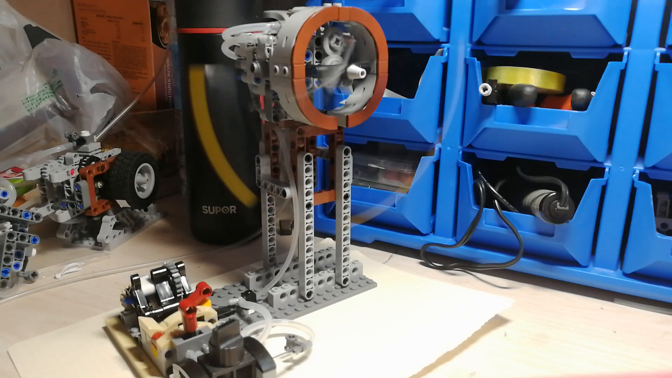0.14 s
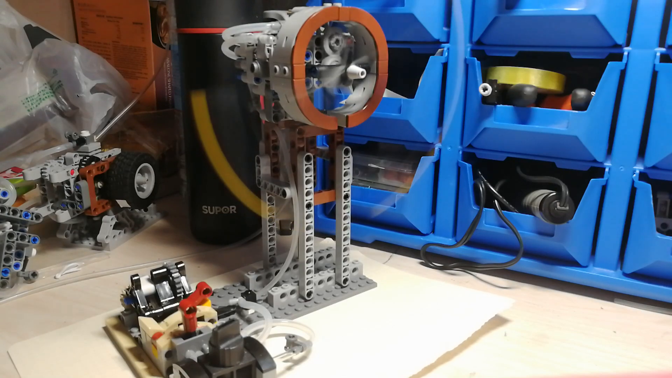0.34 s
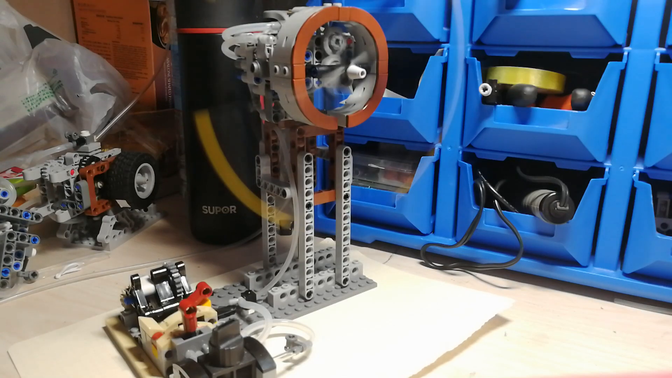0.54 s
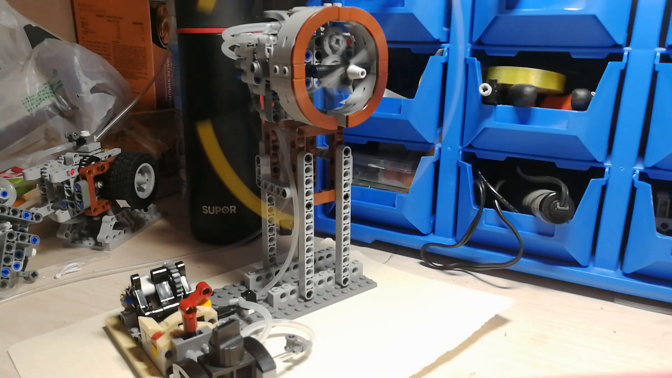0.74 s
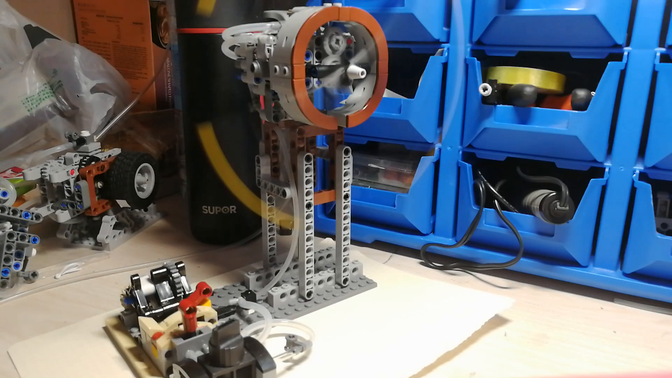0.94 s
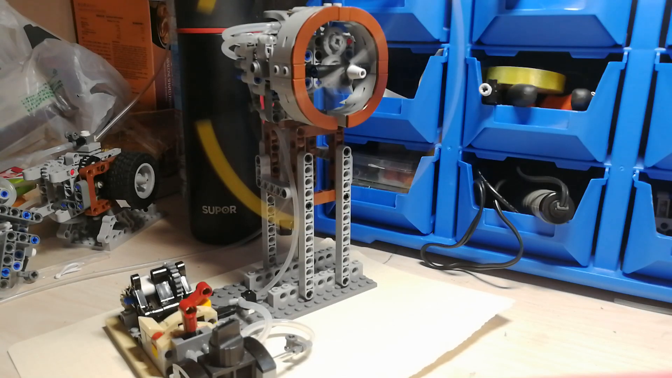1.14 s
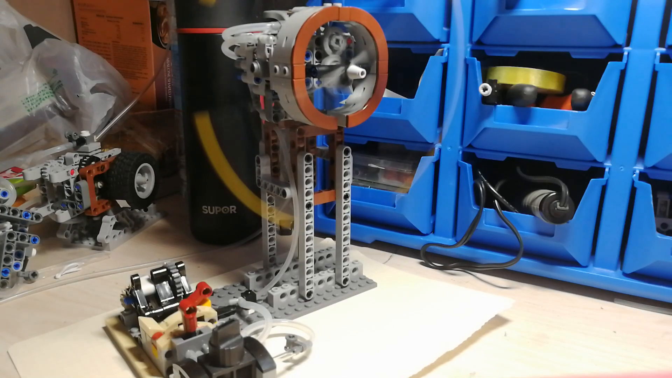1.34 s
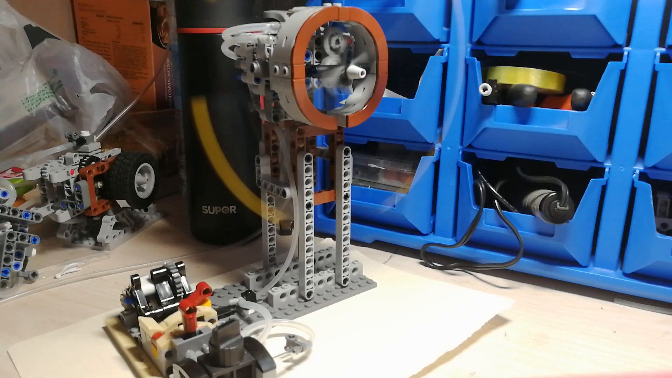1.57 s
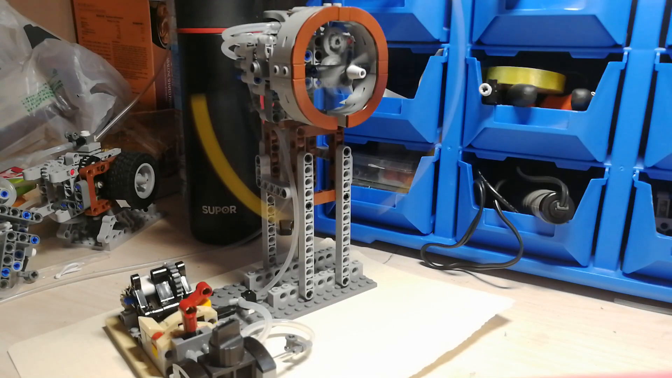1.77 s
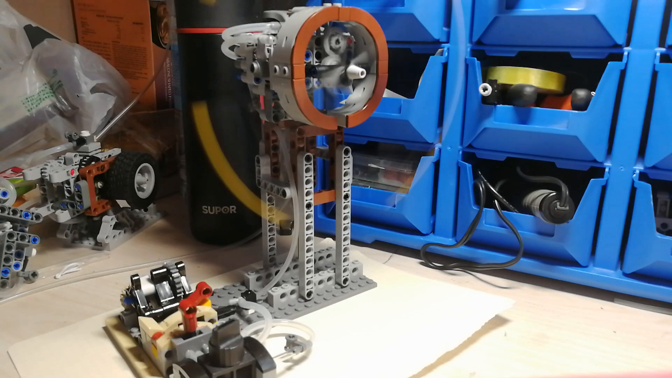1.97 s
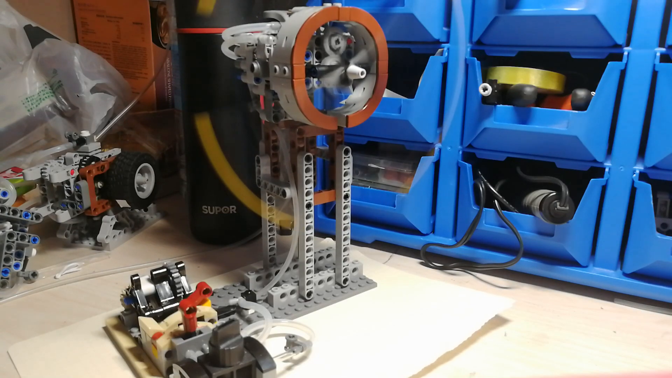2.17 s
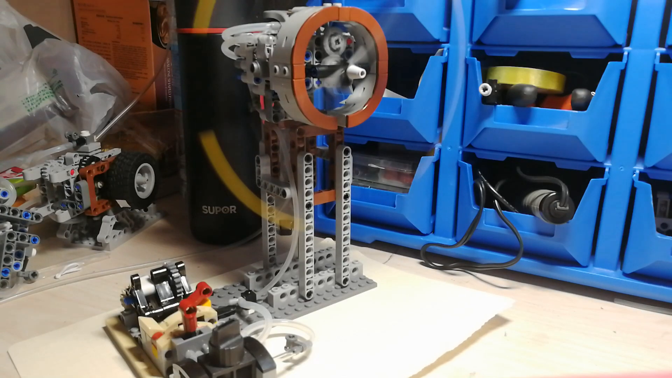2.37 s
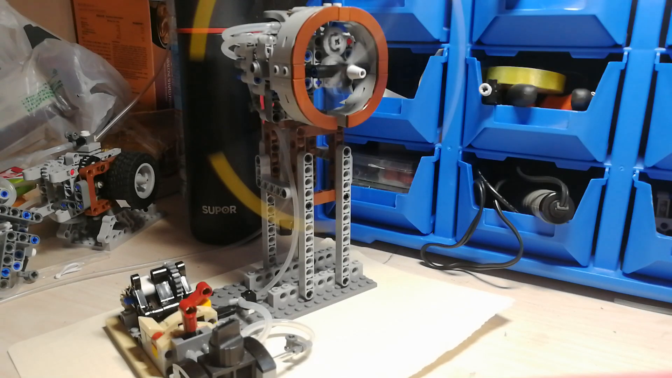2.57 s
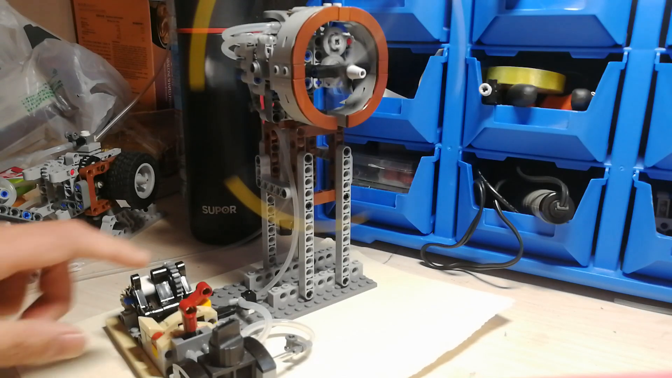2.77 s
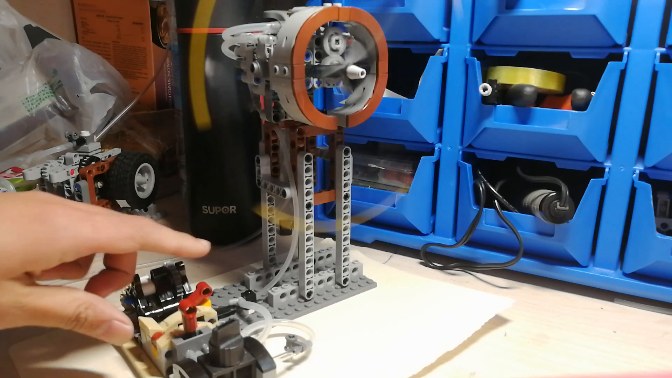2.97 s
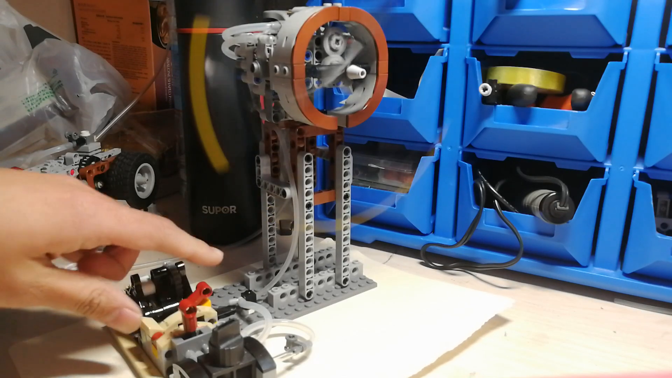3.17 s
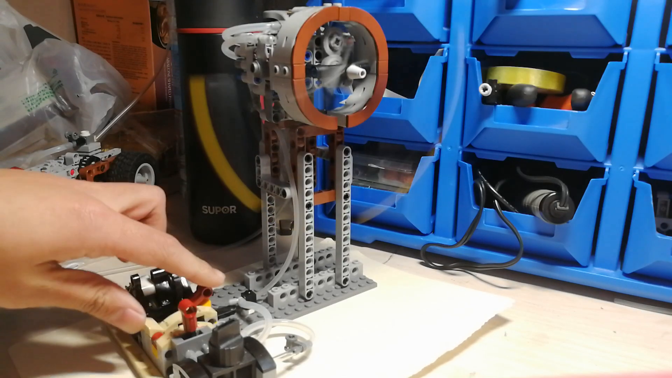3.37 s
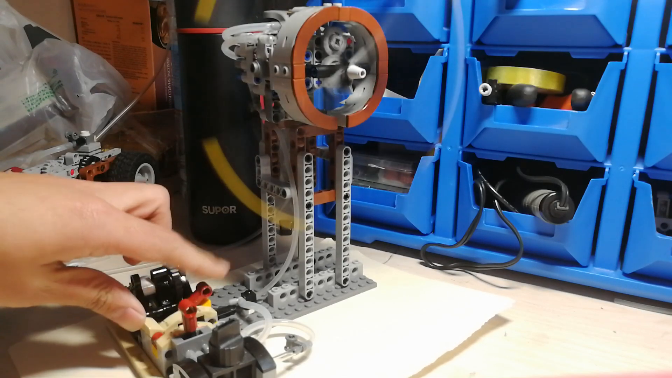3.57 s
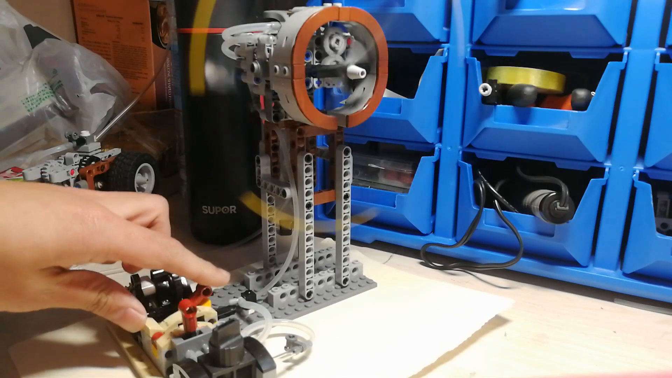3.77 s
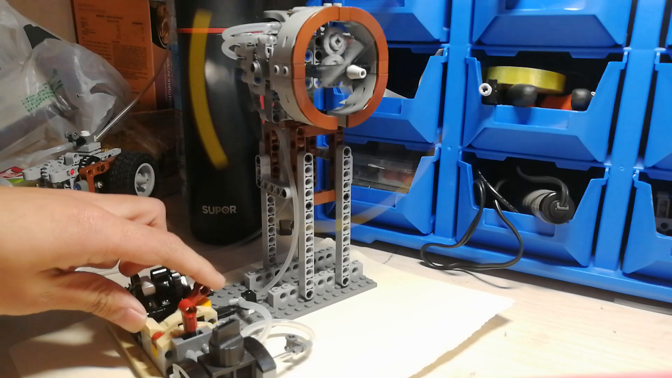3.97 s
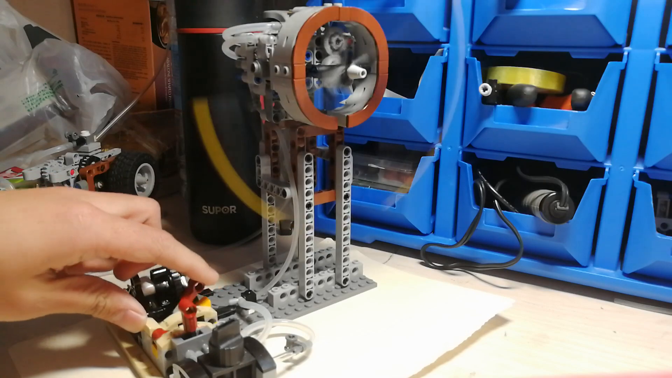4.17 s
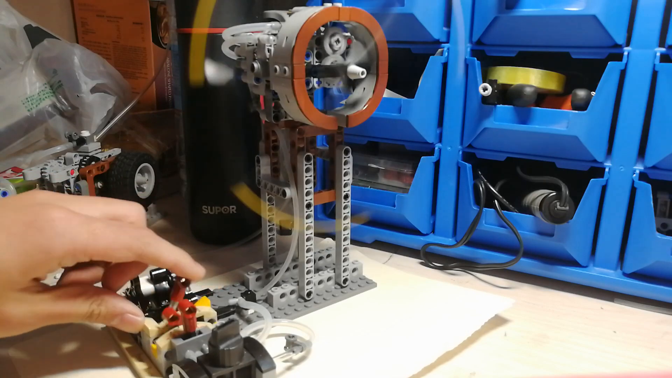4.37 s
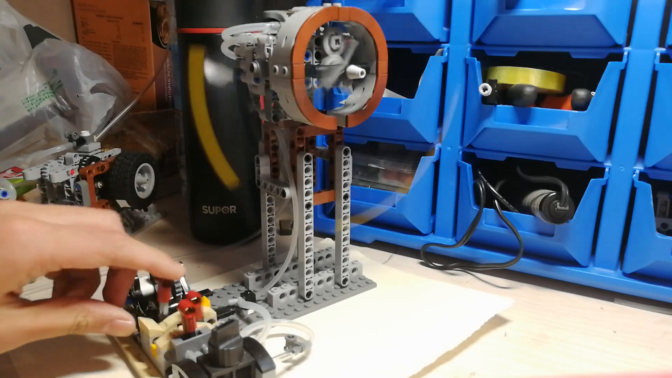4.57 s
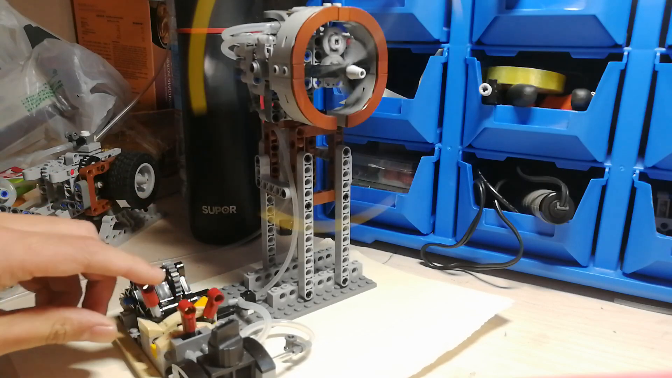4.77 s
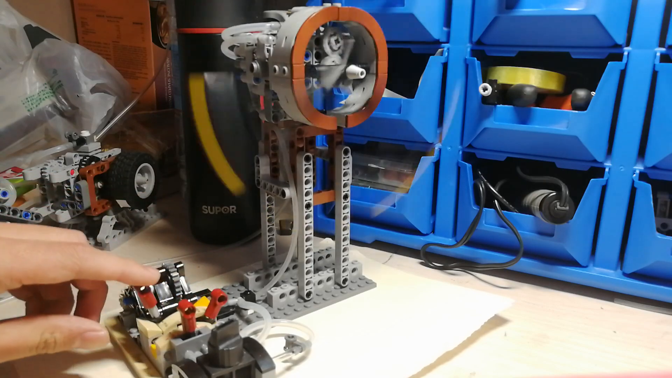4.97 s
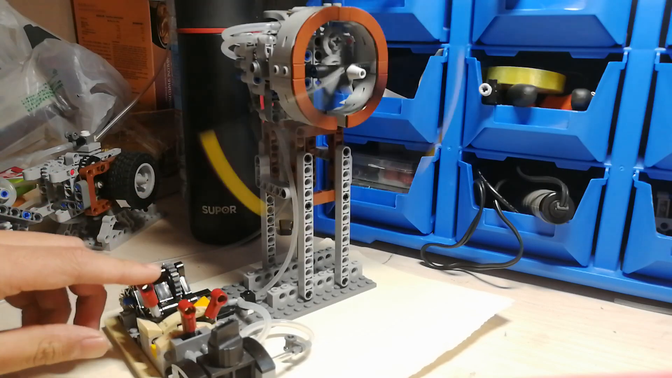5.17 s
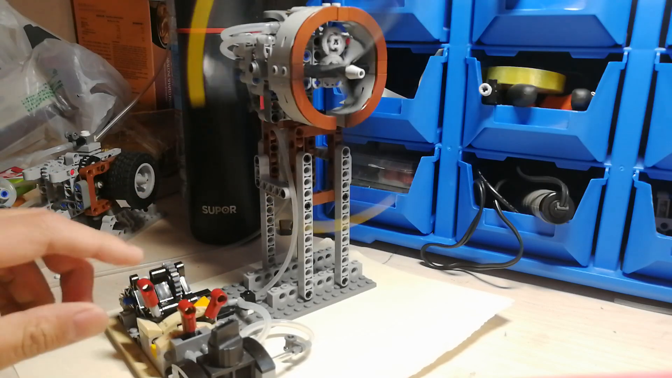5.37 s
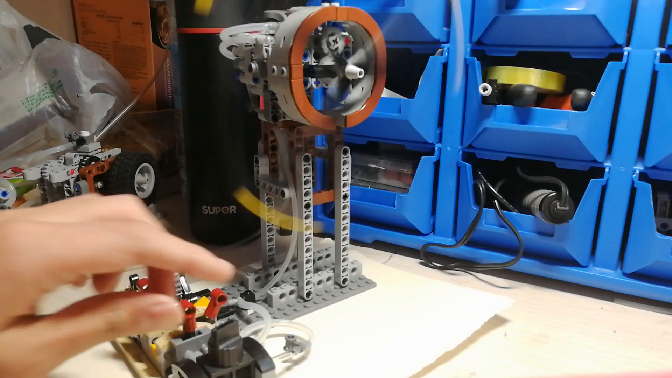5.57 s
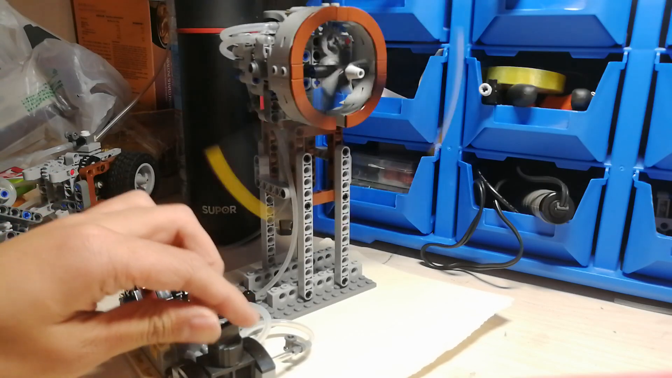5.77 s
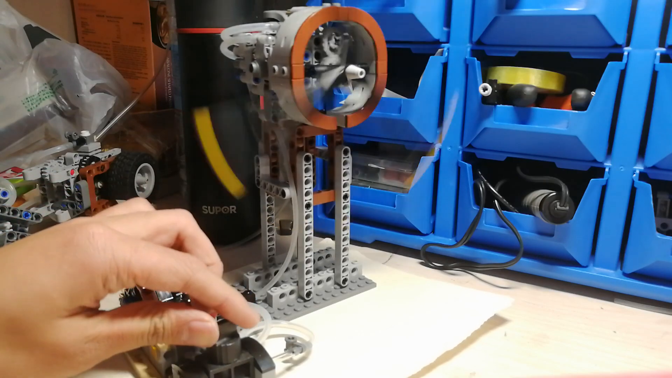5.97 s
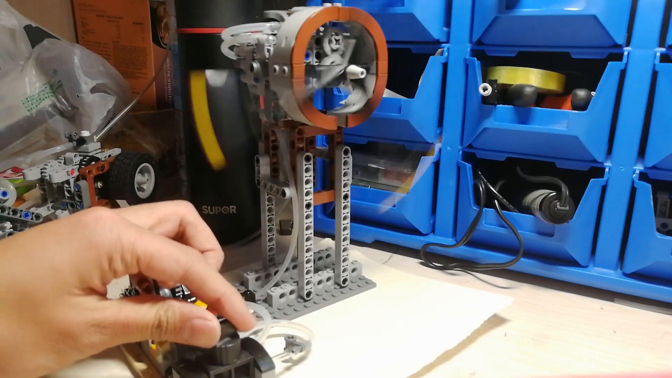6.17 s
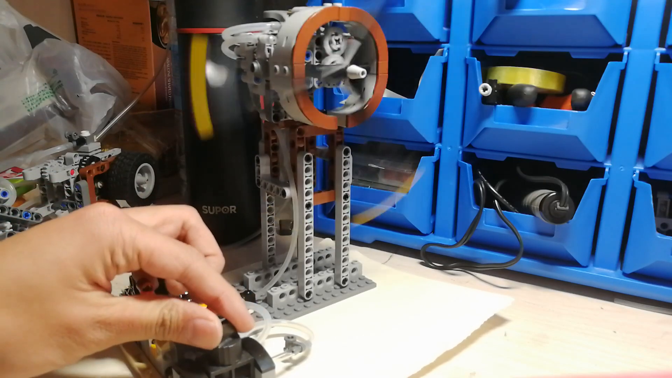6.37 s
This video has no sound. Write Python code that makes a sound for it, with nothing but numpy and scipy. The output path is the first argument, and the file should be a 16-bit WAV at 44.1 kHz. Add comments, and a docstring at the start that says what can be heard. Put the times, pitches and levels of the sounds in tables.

```python
"""A toy air engine made of plastic bricks spins a propeller on a workbench, about ten turns a second.
In every turn the piston clacks at both ends of its travel, used air puffs out and the bench throbs.
Loose pins rattle, air leaks past the seals, and the plastic frame colours these sounds.
Near the end a hand throttles the air: the leak fades, the throttle hisses and the engine chuffs on
at half speed. The small room adds a short echo and a low rumble."""
import sys
import numpy as np
from scipy import signal
from scipy.fft import rfft, irfft, next_fast_len
from scipy.io import wavfile
from scipy.ndimage import map_coordinates

SR = 44100
rng = np.random.default_rng(int(sys.argv[2]) if len(sys.argv) > 2 else 0)


def master_out(mix):
    """Clip the mix to full scale and print it as 16-bit PCM to the path in sys.argv[1]."""
    frames = np.transpose(np.atleast_2d(mix))
    ceiling = np.clip(frames, -1, 1)
    pcm = np.round(ceiling * 32767).astype(np.int16)
    wavfile.write(sys.argv[1], SR, pcm)


N = 283563

# Tone of the bright clack and of the dull knock: f/Hz, level/dB
CLACK_TONE = [(600, -32), (2000, -22), (3200, 1.5), (5200, 0), (6500, 8), (9500, 6.5), (11000, -1),
              (13000, -27), (16000, -52)]
KNOCK_TONE = [(150, -19.5), (400, -11.5), (600, -6), (780, -7.5), (1000, -6), (1500, 0), (2100, -2.5),
              (3000, -8), (6000, -31.5)]
def clatter(frame):
    """The engine's hits all sound through the same bricks: a bright clack over a dull knock."""
    clack_force, knock_force = np.linalg.norm([linkage(), hard_snaps(), rattle()], axis=0)
    clack = radiate(clack_force, CLACK_TONE, frame, grain_db=0.5, grain_rate=1700)
    knock = radiate(knock_force, KNOCK_TONE, frame, grain_db=2.25, grain_rate=680)
    return clack + knock


# The small hits that make up one stroke: delay/s, level/dB, t60/s (the time to fade by 60 dB)
FIRST_CLACK_HITS = [(0, -2.5, 0.032), (.0018, -1, .022), (.004, 0.5, 0.088), (.0075, -18.5, 0.034)]
RETURN_CLACK_HITS = [(0, 0.85, 0.016), (.003, 0.5, 0.021)]
FIRST_KNOCK_HITS = [(.001, 5.5, 0.12), (.004, 5, 0.14), (.008, -24, 0.069)]
RETURN_KNOCK_HITS = [(.001, -3.6, 0.026), (.005, 2.7, 0.024)]
# How hard they strike: level/dB, change with air pressure/(dB per dB), scatter/dB
FIRST_CLACK_FORCE = (-22, 0.36, 0.74)
RETURN_CLACK_FORCE = (-24.5, 0.45, 2.7)
FIRST_KNOCK_FORCE = (-35.5, 0.33, 0.25)
RETURN_KNOCK_FORCE = (-32.5, 0.11, 1)
def linkage(clack_db=-0.3, knock_db=-3.5):
    """The loose piston rod and valve gear snap over at both ends of travel: clack and knock forces."""
    def snap(times, force, hits):
        return hit_force(times, strength(times, force), hits, scatter_db=2.5, scatter_s=0.0005)

    first, back = stroke_times()
    clack = np.hypot(snap(first, FIRST_CLACK_FORCE, FIRST_CLACK_HITS),
                     snap(back, RETURN_CLACK_FORCE, RETURN_CLACK_HITS))
    knock = np.hypot(snap(first, FIRST_KNOCK_FORCE, FIRST_KNOCK_HITS),
                     snap(back, RETURN_KNOCK_FORCE, RETURN_KNOCK_HITS))
    return amp(clack_db) * clack, amp(knock_db) * knock


# Extra hard strokes: t/s, clack level/dB, knock level/dB
HARD_SNAPS = [(0.135, -25, -44), (0.189, -20.5, -34), (.2908, -20.5, -46), (.339, -29, -50),
              (0.4977, -19, -38), (0.6395, -26, -49), (0.743, -22, -40), (0.9417, -25, -46),
              (1.7394, -21, -44), (1.894, -21, -35), (2.199, -23, -27.5), (2.242, -22, -49),
              (2.399, -21.5, -32), (2.807, -21, -47), (2.9095, -15.5, -49), (3.011, -28, -28),
              (3.2138, -20.5, -38), (3.219, -16, -38), (3.5268, -18, -36), (3.574, -23, -51),
              (3.633, -20, -38), (4.262, -19, -35), (4.584, -26, -26), (4.634, -25, -40), (4.698, -25, -30),
              (4.753, -22, -27), (4.813, -21, -40), (4.868, -26, -43), (4.936, -31, -41), (5, -26, -35),
              (5.0797, -42, -45), (5.788, -30, -46), (5.9803, -24, -51), (6.1715, -27, -54),
              (6.3632, -25, -46)]
def hard_snaps(clack_t60=0.041, knock_t60=0.029):
    """Now and then the linkage slams across all its slack in one crisp snap."""
    times, clack_db, knock_db = np.transpose(HARD_SNAPS)
    clack = hit_force(times, clack_db, [(0, 0, clack_t60)])
    knock = hit_force(times, knock_db, [(0, 0, knock_t60)])
    return clack, knock


# The crank sags slowly, then the throttle halves its speed: t/s, speed/(turns per second)
CRANK_SPEED = [(0.0, 9.841), (0.76, 9.882), (0.87, 10.031), (1.48, 10.061), (2.64, 9.816), (4.49, 9.359),
               (4.74, 8.927), (4.87, 7.649), (5.29, 5.64), (5.77, 5.245), (6.4, 5.195)]
def crank_turns(start_turn=.155):
    """How far the crank has turned at each sample; a first stroke falls on every whole number."""
    return start_turn + np.cumsum(curves(CRANK_SPEED)[0]) / SR


# Where the piston turns back: speed/(turns per second), position/turns
RETURN_POINT = [(5.2, .463), (10, .473)]
def stroke_times():
    """When the piston reaches each end of its travel: the first strokes, then the return strokes."""
    turn, t = crank_turns(), np.arange(N) / SR
    past_return = turn - look_up(RETURN_POINT, curves(CRANK_SPEED)[0])
    whole = np.arange(int(turn[-1]) + 1)
    first = np.interp(whole, turn, t, left=-turn[0] / CRANK_SPEED[0][1])
    back = np.interp(whole[whole < past_return[-1]], past_return, t)
    return first, back


# What drives the engine and shakes the bench: t/s, air pressure/dB (0 is full), throb level/dB
DRIVE = [(0, 0, -41.5), (1, -1.5, -41), (2, -1.2, -41.5), (3.801, -1.9, -42), (4.6, -2.2, -44),
         (4.951, -6.5, -43), (5.09, -12, -45.5), (5.201, -10, -46), (5.6, -13.5, -42.5), (6.43, -12, -40.5)]
def strength(times, force):
    """Levels in dB at these times: they follow the air pressure, with a little chance."""
    full_db, follows, scatter_db = force
    s, pressure_db, _ = np.transpose(DRIVE)
    scatter = scatter_db * rng.standard_normal(len(times))
    return full_db + follows * np.interp(times, s, pressure_db) + scatter


# Loose pins that catch: t/s, level/dB
PIN_CATCHES = [(.459, -28), (0.66, -32), (1.263, -28.5), (2.664, -26.5), (2.976, -29), (3.184, -27),
               (5.0266, -25.5), (6.2807, -32)]
# The valve's tick and chatter: level/dB, change with air pressure/(dB per dB), scatter/dB
TICK_FORCE = (-41, 0.1, 1.5)
CHATTER_FORCE = (-25, 0.58, 2)
def rattle(click_db=-7, knock_db=-11, fade_db=8, click_turns=.33, tick_turn=.585, chatter_turns=0.13):
    """Loose pins click after each first stroke and sometimes catch; the valve ticks, then chatters."""
    first = np.repeat(stroke_times()[0], 4)  # four clicks a turn
    late = rng.uniform(0.25, 1, len(first))
    click_times = first + click_turns * late / look_up(CRANK_SPEED, first)
    levels_db = strength(first, FIRST_CLACK_FORCE) + click_db - fade_db * late  # later is weaker
    clicks = hit_force(click_times, levels_db, [(0, 0, 0.011)], scatter_db=4)
    turn = crank_turns()
    tick_times = np.interp(np.arange(tick_turn, turn[-1]), turn, np.arange(N) / SR)
    ticks = hit_force(tick_times, strength(tick_times, TICK_FORCE), [(0, 0, .04)])
    lag_turns = chatter_turns * rng.uniform(0.41, 1, len(tick_times))
    chatter_times = tick_times + lag_turns / look_up(CRANK_SPEED, tick_times)
    chatter = hit_force(chatter_times, strength(chatter_times, CHATTER_FORCE), [(0, 0, .022)])
    catches = hit_force(*np.transpose(PIN_CATCHES), [(0.0012, 0, 0.057)])
    clack = np.linalg.norm([clicks, ticks, catches, chatter], axis=0)
    return clack, amp(knock_db) * clack


# Tone of the puffs: f/Hz, level/dB
PUFF_TONE = [(200, -5.5), (550, -2), (800, -3), (1400, -1), (2400, -8), (3400, 5.5), (5200, 7), (6500, 15),
             (9500, 10.5), (11000, 7.5), (13000, -0.5), (16000, -21)]
# How hard they blow: level/dB, change with air pressure/(dB per dB), scatter/dB
FIRST_PUFF_FORCE = (-29.5, 0.85, 0.96)
SECOND_PUFF_FORCE = (-28, 1.5, 0.62)
def exhaust(frame, gain_db=4.5, open_turns=(0.091, 0.19), rise_turns=0.019, fall_turns=0.044):
    """After each return the valve lets used air out in two puffs, longer when the engine is slow."""
    _, back = stroke_times()
    speeds = look_up(CRANK_SPEED, back)
    power, t = np.zeros(N), np.arange(SR // 4) / SR
    for opens, force in zip(open_turns, (FIRST_PUFF_FORCE, SECOND_PUFF_FORCE)):
        for s, speed, db in zip(back, speeds, strength(back, force)):
            age = np.maximum(t * speed - opens + rng.uniform(-0.007, 0.026), 0)
            puff = (1 - np.exp(-age / rise_turns)) ** 2 * np.exp(-age / fall_turns)
            add(power, s, amp(db + gain_db) ** 2 * puff / puff.max())
    return radiate(np.sqrt(power), PUFF_TONE, frame, grain_db=1.7, grain_rate=700)


# Notes of the base plate: f/Hz, level/dB
PLATE_NOTES = [(735, 4.5), (990, -4)]
# How hard it is tapped: level/dB, change with air pressure/(dB per dB), scatter/dB
PLATE_FORCE = (-39, 0.9, 0.59)
def base_plate(frame, delay_s=.001, rise_s=0.0013, t60=0.043, return_db=0.5, detune=0.013):
    """Each stroke taps the hollow base plate, more softly as the pressure drops."""
    taps, t = np.zeros(N), np.arange(SR // 10) / SR
    envelope = amp(-60 * t / t60) * (1 - np.exp(-t / rise_s))
    for times, stroke_db in zip(stroke_times(), (0, return_db)):
        for s, db in zip(times, strength(times, PLATE_FORCE)):
            for hz, note_db in PLATE_NOTES:
                note = envelope * detuned_sine(hz, detune, t)
                add(taps, s + delay_s, amp(db + stroke_db + note_db) * note)
    return filtered(taps, frame)


# Notes of the cylinder and rods: f/Hz, first stroke level/dB, return level/dB,
# left minus right/dB, change with air pressure/(dB per dB), t60/s
ROD_NOTES = [(830, -60, -51, 1, 0, .04), (1410, -51, -45, -2, 0, .05), (4635, -34.5, -35, 4, 1.2, .07),
             (6943, -37, -44, 0, .1, .06), (7420, -36, -42, 2, .1, .05)]
def ringing_rods(delay_s=.003, rise_s=0.0015, detune=0.0049, scatter_db=1.5):
    """Cylinder and rods ring on briefly, in a new mix at every stroke."""
    sound, t = np.zeros((2, N)), np.arange(SR // 10) / SR
    for hz, first_db, return_db, pan_db, follows, t60 in ROD_NOTES:
        envelope = amp(-60 * t / t60) * (1 - np.exp(-t / rise_s))
        ring = np.zeros(N)
        for times, full_db in zip(stroke_times(), (first_db, return_db)):
            for s, db in zip(times, strength(times, (full_db, follows, scatter_db))):
                add(ring, s + delay_s, amp(db) * envelope * detuned_sine(hz, detune, t))
        sound += np.outer(amp([pan_db / 2, -pan_db / 2]), ring)
    return sound


# The leak through one turn: position/turns, level/dB
LEAK_FLOW = [(0, 3.5), (.1, 5.5), (.3, 4.5), (.45, 2.5), (.7, 4), (.85, -1)]
# Its tone: f/Hz, level/dB
LEAK_TONE = [(200, -5.5), (550, -9.5), (800, -11.5), (1600, -8), (2400, -4.5), (5000, -2.5), (6500, 1.5),
             (9700, -2), (11500, -6), (13500, -11), (16000, -26)]
def leak(frame, gain_db=-35.5):
    """Air escapes past the seals all the time, least just before the cylinder refills."""
    cycle_db = np.interp(crank_turns(), *np.transpose(LEAK_FLOW), period=1)
    flow = amp(curves(DRIVE)[0] + gain_db + cycle_db)
    return radiate(flow, LEAK_TONE, frame, grain_db=1.5, grain_rate=300)


# Air drawn into the cylinder through one turn: position/turns, level/dB
INTAKE_FLOW = [(0, 7), (.04, -2), (.07, -2), (.25, -15), (.45, -3), (.6, 1), (.7, -21), (.995, -20)]
# Tone of the hiss: f/Hz, level/dB
THROTTLE_TONE = [(3000, -38), (6000, -8), (9000, -21), (11500, 5), (13500, -2), (16000, -16)]
def throttle(frame, gain_db=-45):
    """The half-closed throttle hisses thinly whenever the cylinder draws air through it."""
    pressure_drop = np.clip(1 - amp(curves(DRIVE)[0]), 0, 1)
    cycle_db = np.interp(crank_turns(), *np.transpose(INTAKE_FLOW), period=1)
    flow = pressure_drop * amp(gain_db + cycle_db)
    return radiate(flow, THROTTLE_TONE, frame, grain_db=3.5, grain_rate=300)


# Tone of the piston's rubbing seal: f/Hz, level/dB
SCRAPE_TONE = [(1500, -35), (3000, -6), (5200, -2), (6400, 8), (7500, -19), (10000, 5), (14000, -10)]
def piston(frame, air_db=-58.5, mid_hz=1080, swing_octaves=.3, width_hz=330, scrape_db=-43.5):
    """Air in the cylinder rings higher, then lower, as the piston slides; the seal scrapes going in."""
    angle = 2 * np.pi * crank_turns()
    hz = mid_hz * 2 ** (-swing_octaves * np.cos(angle))
    lowpass = signal.butter(2, width_hz / 2, fs=SR, output="sos")
    flutter = signal.sosfilt(lowpass, rng.standard_normal((2, 2, N)))
    glide = np.exp(2j * np.pi * np.cumsum(hz) / SR)
    air = unit(np.real((flutter[0] + 1j * flutter[1]) * glide))  # a band of noise around hz
    sliding = np.sin(angle)
    rub = amp(scrape_db) * np.maximum(sliding, 0) ** 2
    scrape = radiate(rub, SCRAPE_TONE, frame, grain_db=2, grain_rate=210)
    return amp(air_db) * spread(air * sliding ** 2) + scrape


# Pitches the frame boosts, at depth 1: f/Hz, width/Hz, left level/dB, right level/dB
FRAME_PEAKS = [(721.5, 120, 7, -13.5), (859, 158, 11, 10), (998, 60, 6, -1), (1273, 195, 2.5, 5),
               (1421, 93, 2, 7.5), (1710, 120, 2, 8.5), (1936, 125, 11, 10), (2270, 78, 1.5, 8.5),
               (2350, 220, 1.5, 0), (2940, 127, 3.5, 9), (3406, 190, 7.5, 5.5), (3900, 150, 9.5, 1.5),
               (4300, 260, -3, 5), (4625, 206, 13, 6.5), (4970, 120, 4, 1.5), (6170, 1300, 3.5, -2.5),
               (6580, 160, 2.5, 5), (7440, 89, 8.5, 0), (9100, 72, 9.5, -3), (9780, 570, 2, 4)]
# How far the frame's sound runs ahead on the left: f/Hz, phase/radians
LEFT_LEAD = [(300, 0.55), (650, 1.2), (850, 1.7), (1100, -1.6), (1400, -0.5), (1800, 0.12)]
def frame_response(depth, lead_s=0.000239):
    """How the plastic frame colours sound on its way to each side; the left is nearer."""
    hz = bins()
    peaks_db = sum(np.outer([left, right], 1 / (1 + (2 * (hz - centre) / width) ** 2))
                   for centre, width, left, right in FRAME_PEAKS)
    phase = 2 * np.pi * hz * lead_s + look_up_hz(LEFT_LEAD, hz)
    return causal(amp(depth * peaks_db)) * np.exp(1j * np.outer([.5, -.5], phase))


# Low notes of the stand and bench: f/Hz, level/dB, length/s
BENCH_NOTES = [(96.54, 2, 0.08), (63.6, -10, 0.066), (81, -8.5, 0.034), (130.5, -16, 0.046),
               (193, -35, 0.094)]
def bench(lags_s=(0.0038, 0.0044), return_db=0.5, scatter_db=1.85):
    """Each stroke rocks the tall stand, which passes a swelling throb to the bench top."""
    throb = np.zeros(N)
    for times, lag, stroke_db in zip(stroke_times(), lags_s, (0, return_db)):
        for s in times:
            for hz, db, length in BENCH_NOTES:
                t = np.arange(int(length * SR)) / SR
                gain = amp(db + stroke_db + scatter_db * rng.standard_normal())
                swell = np.sin(np.pi * t / length) ** 2
                add(throb, s + lag, gain * swell * np.sin(2 * np.pi * hz * t))
    return unit(throb) * amp(curves(DRIVE)[1])


def stand(hz=245, gain_db=-57.5, t60=0.14, rise_s=0.019, scatter_db=0.5, scatter_s=0.0009):
    """The stand hums after each stroke, louder when more air drives the engine."""
    hum, t = np.zeros(N), np.arange(SR // 4) / SR
    note = amp(-60 * t / t60) * (1 - np.exp(-t / rise_s)) * np.sin(2 * np.pi * hz * t)
    for s in np.concatenate(stroke_times()):
        size, late = rng.standard_normal(2)
        add(hum, s + scatter_s * late, amp(scatter_db * size) * note)
    return unit(hum) * amp(curves(DRIVE)[0] + gain_db) * amp([[-.7], [.7]])  # a little to the right


# How long the room rings: f/Hz, t60/s
ECHO_FADE = [(200, 0.066), (2000, 0.22), (8000, 0.064), (15000, 0.29)]
def room_echo(x):
    """The small workroom answers with a short echo that fades at its own rate at each pitch."""
    hz, t, noise = signal.stft(rng.standard_normal((2, SR // 3)), SR, nperseg=256)
    fade = amp(-60 * t / look_up_hz(ECHO_FADE, hz)[:, None])
    tail = signal.istft(noise * fade, SR, nperseg=256)[1]
    return signal.fftconvolve(x, tail / np.linalg.norm(tail[0]), axes=1)[:, :N]


# Tone of the room's background: f/Hz, level/dB
RUMBLE_TONE = [(15, -19), (30, -23), (50, -9), (100, 16), (170, -3.5), (300, -8), (600, -22.5), (2000, -23),
               (16000, -58)]
def room_rumble(level_db=-55):
    """A low steady rumble, nearly alike on both sides."""
    noise = spread(rng.standard_normal((2, N)))
    return amp(level_db) * unit(filtered(noise, amp(look_up_hz(RUMBLE_TONE, bins()))))


# How alike left and right are: f/Hz, likeness (0 to 1)
STEREO_LIKENESS = [(50, 0.47), (200, 1), (400, 0.77), (700, 1), (1500, 0.7), (2500, 0.51), (4500, 0.045),
                   (7500, 0.019), (12000, 0.14)]
def spread(pair):
    """Two unrelated signals become left and right: alike in the bass, apart in the treble."""
    angle = np.arccos(np.clip(look_up_hz(STEREO_LIKENESS, bins()), 0, 1)) / 2
    mid, side = filtered(pair, np.array([np.cos(angle), np.sin(angle)]))
    return np.array([mid + side, mid - side])


def hit_force(times, levels_db, hits, scatter_db=0, scatter_s=0):
    """Force over time of strokes made of fading hits, each given as delay/s, level/dB, t60/s."""
    power, t = np.zeros(N), np.arange(SR // 5) / SR
    for s, db in zip(times, levels_db):
        for delay, hit_db, t60 in hits:
            size, late = rng.uniform(-1.1, 1, 2)
            hit = amp(db + hit_db + scatter_db * size - 60 * t / t60)
            add(power, s + delay + scatter_s * late, hit ** 2)
    return np.sqrt(power)


def radiate(force, tone, frame, grain_db, grain_rate):
    """Grainy stereo noise: the force sets how loud it is, the tone and frame only colour it."""
    noise = rng.standard_normal((2, N))
    grains = unit(noise * amp(grain_db * np.clip(wobble(grain_rate), -2.5, 2.5)))
    colour = frame * causal(amp(look_up_hz(tone, bins())))
    return filtered(spread(grains * force), colour / np.sqrt(np.mean(abs(colour) ** 2)))


def detuned_sine(hz, detune, t):
    """A pure note, randomly a little out of tune."""
    return np.sin(2 * np.pi * hz * (1 + detune * rng.standard_normal()) * t)


def wobble(rate):
    """A smooth curve through `rate` random points a second."""
    points = rng.standard_normal(int(N * rate / SR) + 4)
    return map_coordinates(points, [np.arange(N) * rate / SR])


def amp(db):
    """Decibels to gain."""
    return 10 ** (np.asarray(db) / 20)


def unit(x):
    """Scale to an average (rms) size of 1."""
    return x / np.sqrt(np.mean(x ** 2) + 1e-20)


def look_up(table, x):
    """Read between the rows of a two-column table."""
    return np.interp(x, *np.transpose(table))


def look_up_hz(table, hz):
    """Read between the rows of a frequency table, with octaves evenly spaced."""
    f, values = np.transpose(table)
    return np.interp(np.log(hz + 1), np.log(f + 1), values)


def curves(table):
    """One value per sample for each column after the time."""
    s, *columns = np.transpose(table)
    return [np.interp(np.arange(N) / SR, s, column) for column in columns]


def add(track, s, sound):
    """Mix a sound into a track, starting at s seconds."""
    start = round(s * SR)
    part = sound[max(-start, 0):max(N - start, 0)]
    track[max(start, 0):][:len(part)] += part


def bins():
    """The frequencies at which filters are given."""
    return np.fft.rfftfreq(2 * next_fast_len(N // 2 + SR // 10), 1 / SR)


def filtered(x, response):
    """Pass x through a filter given on bins()."""
    size = 2 * (response.shape[-1] - 1)
    return irfft(rfft(x, size) * response)[..., :N]


def causal(gain):
    """A filter with this gain that rings only after a hit, never before."""
    cepstrum = irfft(np.log(np.maximum(gain, 1e-6)))
    half = cepstrum.shape[-1] // 2
    forward_only = np.r_[1, np.full(half - 1, 2), 1, np.zeros(half - 1)]
    return np.exp(rfft(cepstrum * forward_only))


def scene():
    """The engine on its bench in the room; clatter and puffs ring the frame the most."""
    strong, mild = frame_response(depth=1.146), frame_response(depth=0.59)
    engine = clatter(strong) + base_plate(mild) + ringing_rods()
    engine += exhaust(strong) + leak(mild) + throttle(mild) + piston(mild)
    return engine + amp(-9) * room_echo(engine) + bench() + stand() + room_rumble()


def record(dry, top_hz=15950):
    """Cut away the very highest treble."""
    return filtered(dry, 1.0 * (bins() < top_hz))


dry = scene()
out = record(dry)
master_out(out)
```